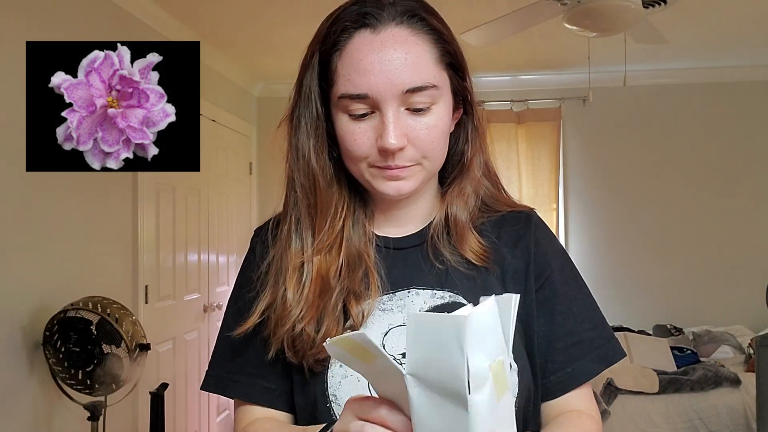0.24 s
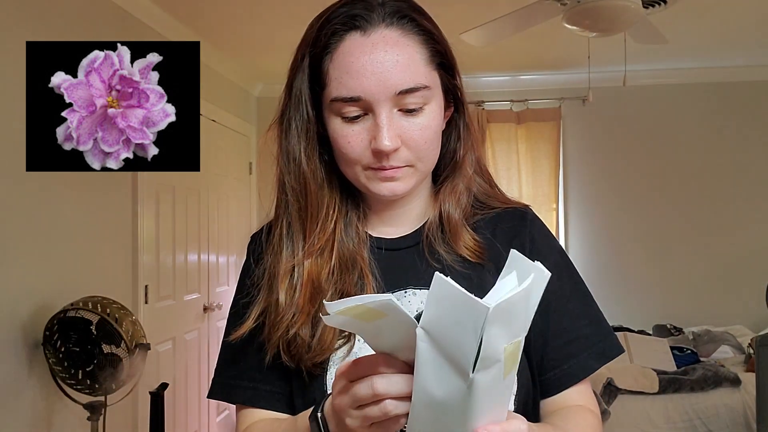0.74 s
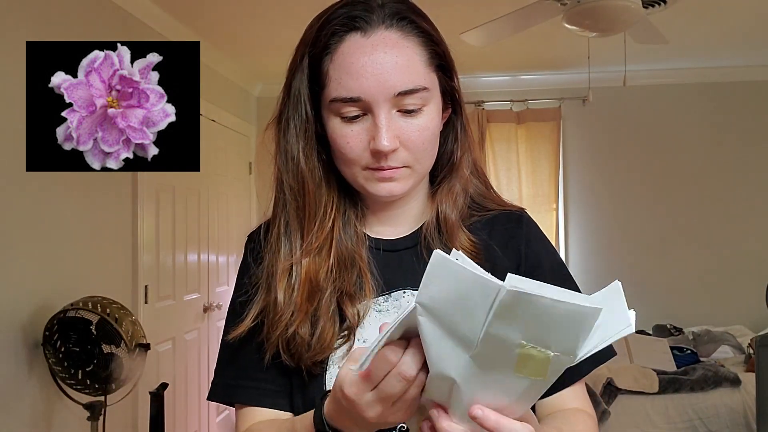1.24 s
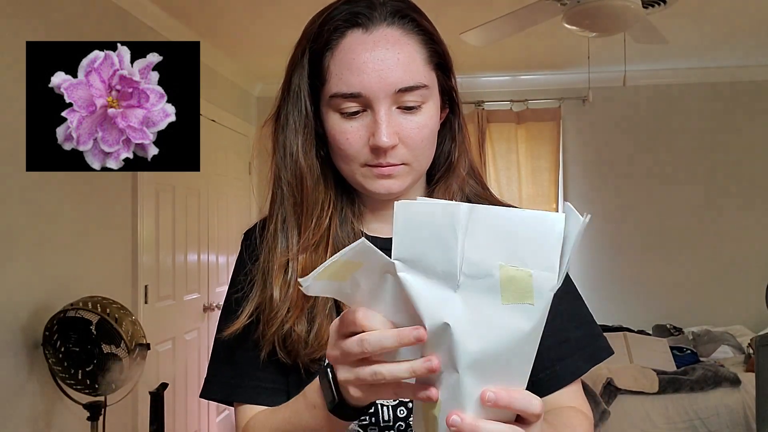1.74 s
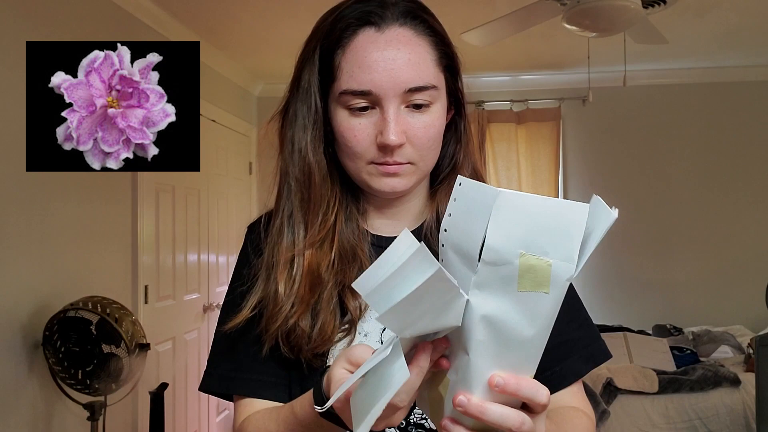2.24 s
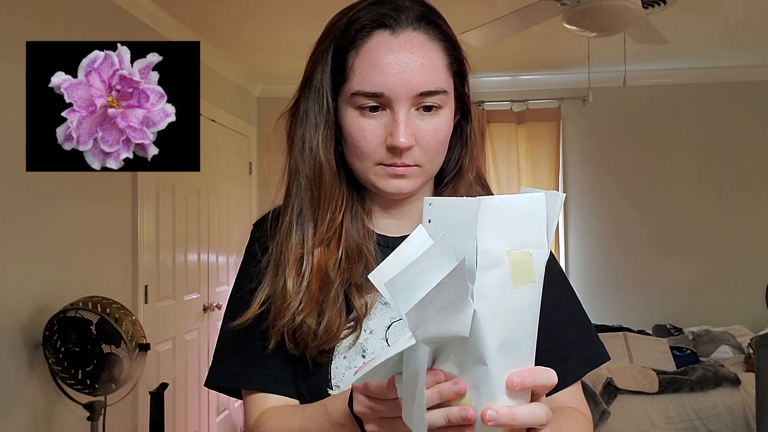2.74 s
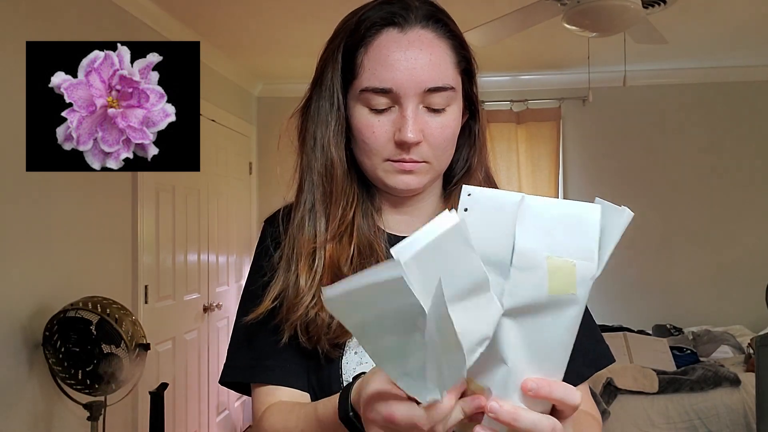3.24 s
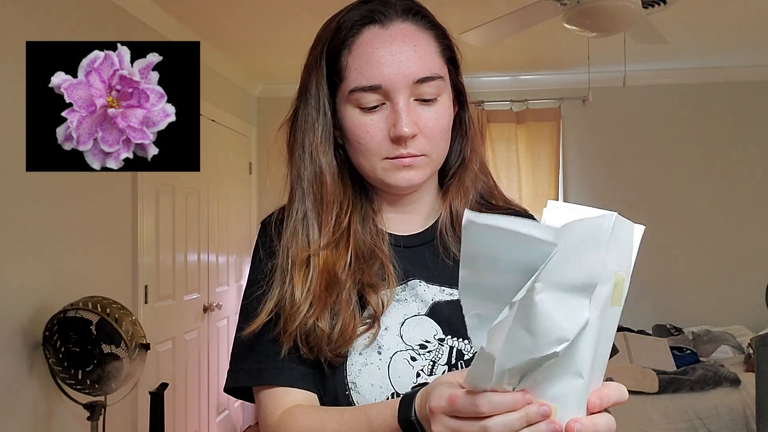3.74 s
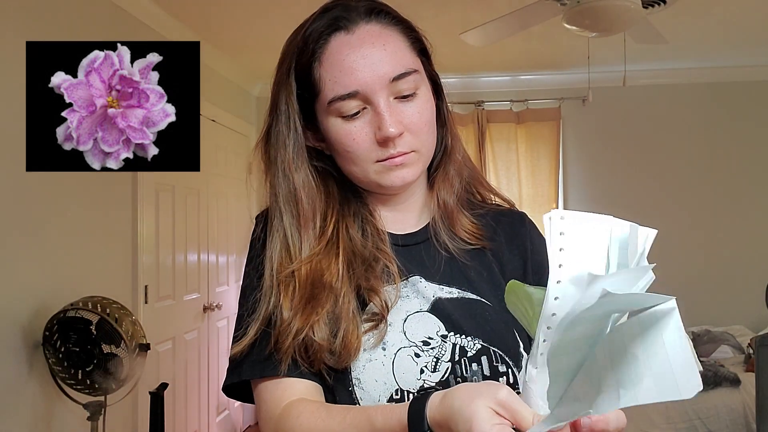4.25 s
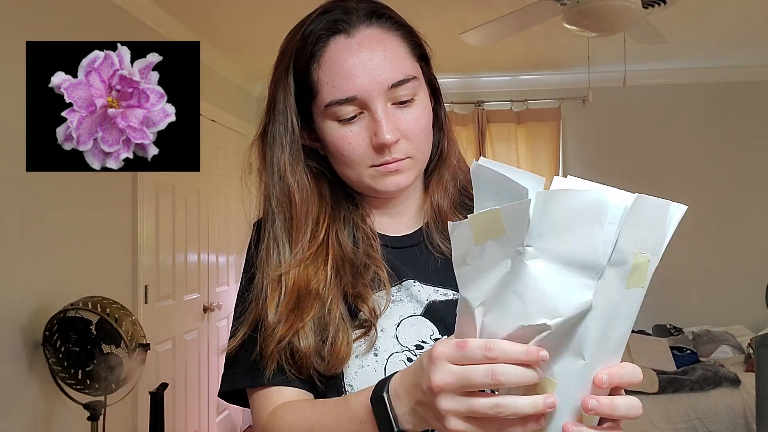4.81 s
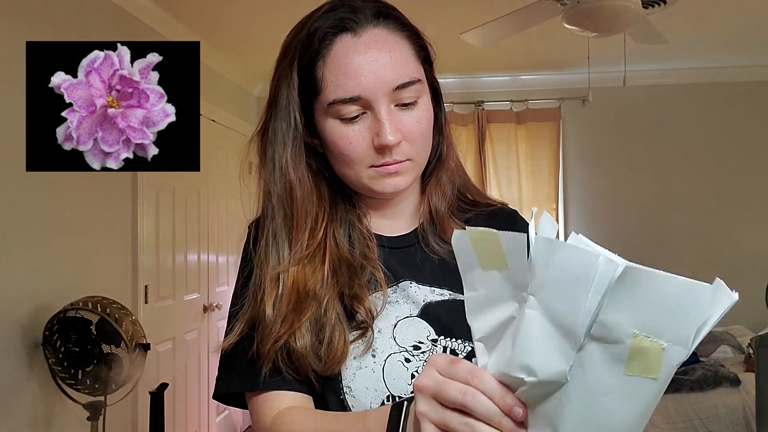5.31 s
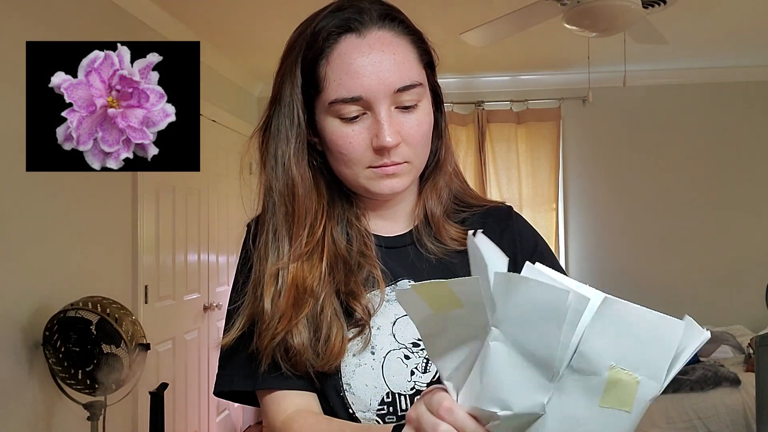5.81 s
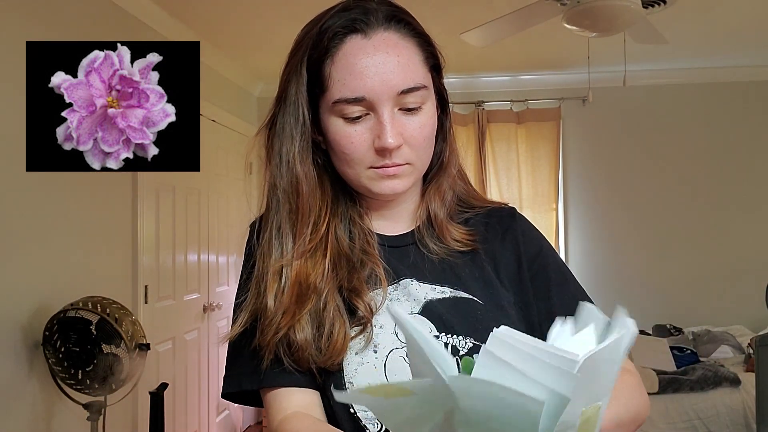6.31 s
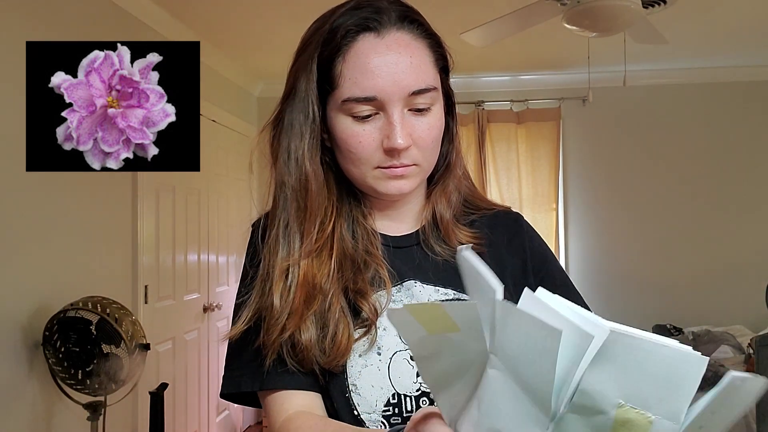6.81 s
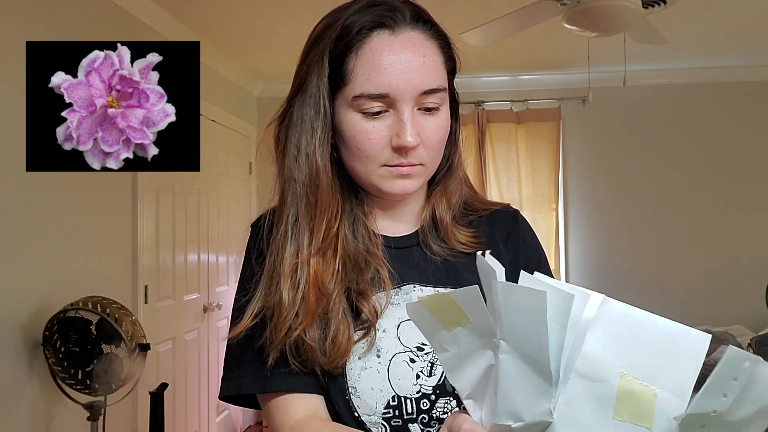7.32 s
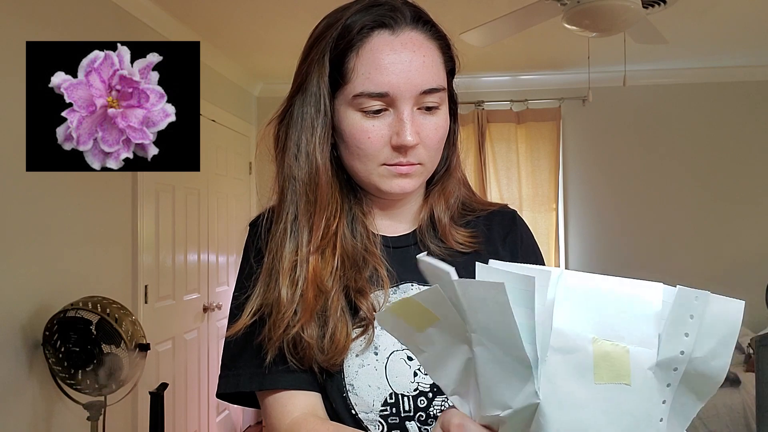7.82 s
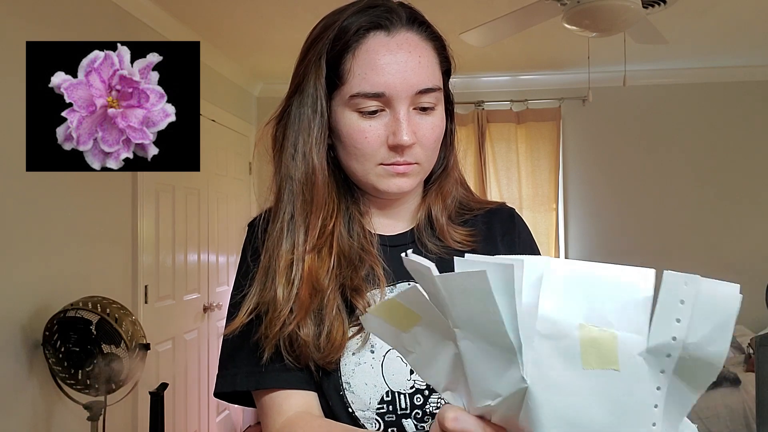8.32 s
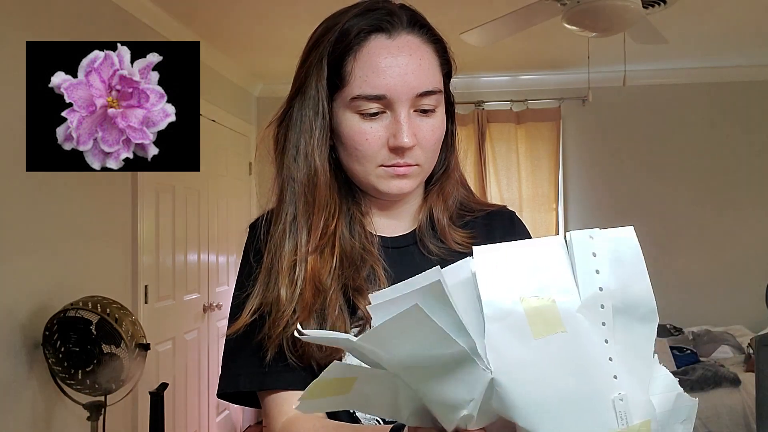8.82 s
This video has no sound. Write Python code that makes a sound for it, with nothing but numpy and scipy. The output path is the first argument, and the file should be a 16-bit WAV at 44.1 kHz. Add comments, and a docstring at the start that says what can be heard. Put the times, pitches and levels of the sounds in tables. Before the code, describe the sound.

A bundle of stiff paper is handled very close to the microphone in a small, quiet, softly furnished room; the left side is much louder and brighter. From 0 to 1 s come small crackles and short rustles. From 1 to 2.8 s the creasing gets busier, with a strong hollow snap near 1.9 s and crisp edge ticks around 2.2 to 2.5 s. At 2.8 to 3.3 s sharp snaps join the fullest rustling, followed by separate cracks until about 4.6 s. It thins to near silence with tiny ticks around 5.2 to 5.8 s. A sudden dense crumple bursts at 5.9 to 6.6 s. Then sparse pops near 7.3 and 7.7 s, light rustling around 8, a soft low bump at 8.3, and stronger snaps at 8.65 and 9 s. Faint low hum and room air stay underneath.

```python
"""Paper cone, peeled and crumpled

A cone of stiff paper sheets is peeled open by hand in a quiet furnished room, close to a pair of
microphone ports; the left port gets it louder and brighter. Clumped puffs of noise make the rustle, struck
resonators the snapping creases and booming panels, short noise bursts the ticks, uneven slips the rasps.
A hand bumps the cone once. Behind lie a diffuse room tail, air noise, mains hum and a wandering low tone."""
import sys
import numpy as np
from scipy import signal
from scipy.fft import rfft, irfft
from scipy.io import wavfile
from scipy.ndimage import map_coordinates

SR = 44100
rng = np.random.default_rng(int(sys.argv[2]) if len(sys.argv) > 2 else 0)


def generate_wav(sig):
    """Save sig (samples, or channels by samples) to the path in sys.argv[1] as 16-bit PCM at SR."""
    pcm = np.round(np.clip(np.atleast_2d(sig).T, -1, 1) * 32767).astype(np.int16)
    wavfile.write(sys.argv[1], SR, pcm)


N = 399546  # length in samples

# Levels in the tables are drives ahead of the room and microphone; some sources add a fixed trim. Bursts of
# crumpling: [full strength at t/s, time to swell by 20 dB/s (at least .01), held/s (at least 0), rustle
# level/dB, treble level/dB re rustle: high when sheets slide]
CRUMPLE_BURSTS = [(0.31, 0.04, 0.024, -42.5, -2.5), (0.449, 0.43, 0.068, -55.5, 5.5),
                  (0.544, 0.12, 0.019, -49, -7), (0.888, 0.05, 0.029, -50, -11), (1.06, 0.11, 0.14, -41, 0),
                  (1.572, 0.27, 0.14, -50.5, -4.5), (1.741, 0.3, .001, -49.5, -7),
                  (1.894, -0.09, 0.07, -43.5, -7), (2.007, 0.14, 0.13, -43.5, -1.5),
                  (2.492, 0.74, .001, -47.5, -9), (2.696, 0.13, 0.0023, -44.5, -7),
                  (2.8, -1, 0.061, -50, -8), (2.895, -0.1, 0.19, -39, -5),
                  (3.065, -0.1147, 0.00086, -32, -5), (3.305, 0.06, 0.0011, -32.5, -7.5),
                  (3.536, 0.07, .001, -37, -6), (3.715, -0.43, .001, -44.5, -14),
                  (3.82, -0.1, 0.039, -52, -7), (3.9, 0.18, 0.24, -47, -4), (4.319, 0.35, .001, -45, 0.5),
                  (4.646, 0.13, .001, -40, -11), (4.808, 0.3, 0.0011, -46.5, -9),
                  (5.074, 0.12, 0.0011, -51, 1.5), (5.272, 0.76, 0.0011, -51, -7),
                  (5.974, 0, 0.052, -39, -2), (6.124, -0.0067, 0.032, -38, -1.5),
                  (6.174, 0.0465, 0.0056, -31.5, -3), (6.356, 0.03, 0.15, -39, -1.5),
                  (6.544, 0.2, 0.0012, -34, -6), (7.304, 0.2, 0.001, -48, -11),
                  (7.89, 0.1, 0.0047, -55.5, 5), (8.05, 0.68, 0.036, -51.5, -9),
                  (8.292, 0.08, 0.0011, -49.5, -4), (8.433, -0.43, 0.16, -52, -6),
                  (8.577, -0.05, 0.14, -48, -3), (9.03, 0.04, .04, -39, -13)]
FADE_DB_PER_S = 181  # how fast a burst dies when the hands let go
# The cone held between bursts: [t/s, faint rustle level/dB, lows level/dB re rustle]
HOLDING_GRIP = [(0.0, -63.5, 5.5), (0.67, -59, -6.5), (0.83, -63, -14), (1.46, -57, -5.5), (1.9, -58, -1.5),
                (3.0, -46.5, -6), (4.3, -71.5, -10), (5.15, -79, -9), (5.44, -74.5, -11),
                (5.74, -60.5, -4.5), (5.9, -52.5, -5), (6.1, -80, -3), (6.24, -60, 7.5), (6.31, -52, -5),
                (6.73, -63.5, -9.5), (7.0, -56.5, -10.5), (7.25, -62, -11), (7.8, -61, -12),
                (8.2, -63.5, -7.5), (8.88, -48, -8.5), (8.97, -56.5, -13)]
FAINT_TREBLE_DB = -5  # re the faint rustle
# A grip firmer than this stiffens the panels: the lows grow less than the rustle
FIRM_DB, LOWS_PER_DB = -48, -0.2743
# Colour of the rustle: [f/Hz, relative level/dB]
PAPER_COLOUR = [(110, -14.5), (200, -8), (460, -5.5), (1000, -5.5), (2000, -8), (4500, -9), (6800, -12.5),
                (9500, -7.5), (14800, -7), (16500, -5)]
# Centres of the panel, crease and edge regions: [f/Hz]
REGION_HZ = [466, 2030, 9900]
# Resonance of the hollow of the cone: [t/s, f/Hz]
HOLLOW_PITCH = [(.2, 342), (.25, 773), (.7, 680), (1.1, 484), (2.3, 488), (2.5, 413), (2.9, 585),
                (3.1, 436), (5.85, 460), (5.96, 820), (6.12, 560), (6.2, 875), (6.33, 750), (6.38, 436),
                (8.65, 640), (8.8, 462)]
# Creases snapping: [t/s, 1.3 ms before the crack, level/dB, crease f/Hz,
# panel level/dB and treble level/dB re the crease, both before a trim]
CREASE_SNAPS = [(0.148, -37.5, 1180, 8, -26), (0.257, -29, 1170, -11, -30), (0.309, -30, 4160, 3, -17),
                (0.434, -21.5, 3500, -10, 1), (0.526, -26, 1250, -4, -14), (0.568, -39.5, 1300, 5, -25),
                (0.604, -37, 2450, 1.5, -30.5), (0.878, -25, 2730, -38, -43.5),
                (1.158, -22.5, 2300, -10.5, -25), (1.222, -27, 2100, -3, -13.5),
                (1.302, -27.5, 2290, -12, -16.5), (1.384, -53, 2040, 20, -1), (1.568, -26.5, 2340, -40, -5),
                (1.666, -25, 3730, -13, -11), (1.725, -25, 1500, -1.5, -22.5), (1.73, -23, 1940, 0, -15.5),
                (1.758, -30, 2220, 2.5, -7.5), (1.831, -28, 2050, -7.5, -31), (1.878, -12, 1470, -6, -15.5),
                (1.949, -32, 2030, 9, -21), (2.118, -22.5, 2130, -10, -8), (2.222, -32, 2960, 6, -3),
                (2.489, -21.5, 3870, -2.5, -4), (2.551, -27, 2060, -12.5, -17.5),
                (2.664, -22.5, 3670, -22, -9.5), (2.788, -14, 2330, -22, -14.5),
                (2.891, -25.5, 2100, -5, -29), (2.965, -24, 2050, -11, -22), (3.057, -18, 2370, -39, -52),
                (3.092, -24, 2070, -31, -25.5), (3.295, -16, 3840, -21, -19),
                (3.348, -22.5, 2260, -29, -14), (3.709, -29, 2180, -10.5, -19),
                (3.81, -22, 2820, -23, -10.5), (3.892, -18.5, 4000, -18.5, -9.5),
                (3.978, -24.5, 1390, -11, -24.5), (3.999, -21, 3400, -27, -8),
                (4.107, -24, 3460, -44.5, -13), (4.303, -20.5, 1470, -18, -27),
                (4.456, -34, 1340, -6.5, -9.5), (4.589, -17.5, 2400, -61.5, -64),
                (4.797, -38.5, 2000, 3, -18), (4.961, -32.5, 1350, -1, -33),
                (5.163, -24.5, 1380, -21.5, -37), (5.942, -26, 1710, -37, -32),
                (5.966, -19.5, 2670, -8.5, -8), (6.013, -22.5, 2170, -14, -4),
                (6.122, -28, 1900, -1.5, -10), (6.172, -14.5, 1680, -47, -9), (6.178, -31, 1310, -4, -13),
                (6.212, -21, 1250, -46, -8), (6.217, -22.5, 1030, -0.5, -15), (6.476, -20.5, 1280, -17, -9),
                (6.506, -17, 2100, -30, -19), (6.545, -30, 2000, 0.5, -6), (7.287, -22, 1610, -12.5, -10),
                (7.671, -35.5, 1620, -31, -54), (8.421, -32.5, 3620, -33, -5),
                (8.648, -15.5, 1390, -44, -16), (8.75, -22.5, 1360, -12.5, -27), (8.9, -30, 1650, -35, -6),
                (9.003, -15, 1450, -19.5, -12.5)]
# Modes of a panel: [f as a multiple of the hollow's pitch, level/dB]
PANEL_MODES = [(1.001, 3.5), (1.9, -4)]
# Sheet edges flicking past each other, dry and short: [t/s, peak level/dB, f/Hz]
EDGE_TICKS = [(1.038, -34, 3000), (1.231, -14, 2250), (1.702, -31, 5000), (2.156, -28, 5210),
              (2.181, -15.5, 2780), (2.208, -17.5, 4500), (2.384, -24, 3500), (2.451, -19, 4300),
              (4.78, -30, 3300), (5.492, -44, 6000), (5.549, -41, 4500), (5.571, -42, 5000),
              (5.597, -39, 6000), (5.751, -45, 5000), (5.808, -29, 4000), (6.869, -23.5, 1500),
              (7.883, -21, 10000), (7.964, -35, 1100), (8.254, -38, 3500), (8.794, -30, 1000)]
TICK_DECAY_S, TICK_OCTAVES = .0015, 0.98  # octaves to either side of the pitch
# A fold dragged over another sheet: [t/s, length/s, rms level/dB before the swell, f/Hz]
FOLD_SCRAPES = [(0.313, 0.033, -33, 4100), (1.09, 0.024, -33, 4100), (1.166, 0.026, -31, 2190),
                (2.891, 0.036, -30, 950), (8.044, 0.017, -43, 2100), (8.558, 0.056, -42, 2100)]
# A hand bumps the cone
THUD_S, THUD_DB, THUD_HZ, THUD_T60_S = 8.285, -38, 134, 0.063
# The cone moves across the ports: [t/s, delay of the right port/s]
RIGHT_PORT_LAG = [(2.2, .00008), (3.6, -.00002)]
ROOM_T60_S, ROOM_DB = 0.2, -10.5
# Likeness of left and right noise: [f/Hz, likeness 0 to 1]
PORT_LIKENESS = [(60, .95), (700, .6), (3000, .4), (7000, .1), (15000, 0)]
# Colour of the room air: [f/Hz, relative level/dB]
AIR_COLOUR = [(18, -31), (30, -12), (81, -1), (124, -14), (402, -22), (981, -58), (15800, -61)]
AIR_DB = -54.5  # rms
# Mains hum: [f/Hz, rms level/dB]
MAINS_HUM = [(60.5, -50)]
# A low tone that comes and goes: [t/s, f/Hz, rms level/dB]
LOW_DRONE = [(0, 85, -83), (1.2, 85.9, -57), (2.9, 82.7, -50), (4.3, 86, -64)]
# Resonances and a dip of the microphone housing: [f/Hz, width/Hz, level/dB]
MIC_HOUSING = [(1020, 68, -7), (2082, 260, 5), (3850, 890, 3)]
# Difference between the ports: [f/Hz, left minus right level/dB]
PORT_DIFFERENCE = [(60, 6), (300, 8), (2400, 10.5), (4400, 14.5), (8500, 13), (14000, 9)]
CUTOFF_HZ = 15760


def handling():
    """Bursts swell, hold and fade; their powers add to the faint rustle of holding, also in the treble."""
    faint_db, lows_db = in_time(HOLDING_GRIP)
    t = np.arange(0, N, 64) / SR
    power = 0
    for full_s, swell_s, held_s, db, treble_db in CRUMPLE_BURSTS:
        rise_db = 20 * np.maximum(full_s - t, 0) / max(swell_s, .01)
        fade_db = FADE_DB_PER_S * np.maximum(t - full_s - max(held_s, 0), 0)
        shape_db = db - rise_db - fade_db
        power = power + from_db([shape_db, shape_db + treble_db]) ** 2
    bursts = np.array([np.interp(np.arange(N) / SR, t, p) for p in power])
    faint = from_db([faint_db, faint_db + FAINT_TREBLE_DB]) ** 2
    level_db, treble_db = 10 * np.log10(bursts + faint)
    panel_db = lows_db + LOWS_PER_DB * (level_db - FIRM_DB)
    return level_db, panel_db, treble_db - level_db


def rustle(per_s, size_db, spread_oct, grain_s, slide_db, patchy_db):
    """Clumped tiny buckles each puff noise around a pitch of their own, over the hiss of sliding sheets."""
    level_db, panel_db, edge_db = handling()
    hollow_hz, = in_time(HOLLOW_PITCH)
    born = rng.random(N) < per_s * from_db(2.5 * drift(20)) / SR
    sizes = from_db(size_db * np.minimum(rng.exponential(1, N), 2.2))[born]
    pitches_hz = (200 * 80 ** rng.random(N))[born]
    slide = from_db(slide_db + drift(8))

    def envelope(hz):
        """A band hears the buckles pitched near it; low ones last longer."""
        near = np.zeros(N)
        near[born] = sizes * np.exp(-(np.log2(pitches_hz / hz) / spread_oct) ** 2)
        decay = np.exp(-1 / ((grain_s + 2 / hz) * SR))
        grains = signal.lfilter([1], [1, -decay], near + 1e-18)
        return rms_one(rms_one(grains) + slide)

    def shares(hz):
        """How much a band belongs to the panel, crease and edge regions."""
        return np.array([np.interp(np.log(hz), np.log(REGION_HZ), row) for row in np.eye(3)])

    def band_db(hz):
        """The handling colour blends between the regions; every band also flickers by itself."""
        panel, _, edge = shares(hz)
        lows_db = panel * min(hz / 300, 1) ** 2 * panel_db / 2
        # the hollow sings more as the lows grow
        hollow_db = np.maximum(11 + panel_db / 2, 0) / (1 + (np.log2(hz / hollow_hz) / .35) ** 2)
        return level_db + lows_db + hollow_db + edge * edge_db + patchy_db * drift(33.0)

    return from_db(17) * banded(PAPER_COLOUR, envelope, band_db, 1 / 3)


def snaps(crack_s, crease_cycles, panel_cycles):
    """A crack of a few ms rings the crease; the panel behind swells and booms at the hollow's pitch."""
    length = 4096
    out = np.zeros((2, N + length))
    t = np.arange(length) / SR
    bright = signal.butter(2, 5500, "high", fs=SR, output="sos")
    small = signal.butter(3, 230, "high", fs=SR, output="sos")  # a small panel radiates no bass
    crack = np.minimum(t / 0.0005, 1) * np.exp(-t / crack_s)
    burst = crack + 0.29 * np.exp(-t / 0.01)  # the fold keeps crackling faintly
    flap = 0.9 * np.exp(-t / 0.0066)  # and shakes the panel unevenly
    noise = rng.standard_normal((len(CREASE_SNAPS), 3, length))
    for (s, snap_db, crease_hz, panel_db, treble_db), (shared, *own) in zip(CREASE_SNAPS, noise):
        own = np.array(own)
        both = shared + own
        body = signal.butter(2, [crease_hz / 2.43, crease_hz * 1.87], "band", fs=SR, output="sos")
        tone = ring(crack * both, crease_hz, crease_cycles / crease_hz)
        crease = 1.1 * tone / np.abs(tone).max() + 1.8 * signal.sosfilt(body, burst * both)
        treble = signal.sosfilt(bright, burst * own)

        panel_hz = np.interp(s, *np.transpose(HOLLOW_PITCH))
        shake = ring(crack * np.abs(shared) + flap * shared, 1.4 * panel_hz, 1.5 / panel_hz)
        panel = sum(from_db(db) * ring(shake, k * panel_hz, panel_cycles / k / panel_hz)
                    for k, db in PANEL_MODES)
        panel = signal.sosfilt(small, panel)
        panel = panel / np.abs(panel).max()

        sound = crease + from_db(treble_db + 13.5) * treble + from_db(panel_db + 6.0) * panel
        at = round((s + 0.0013) * SR)  # the crack begins 1.3 ms after the table's time
        out[:, at:at + length] += from_db(snap_db) * sound
    return out[:, :N]


def ticks():
    """A flicked sheet edge gives a puff of noise of a millisecond or so around its pitch."""
    length = 1024
    out = np.zeros((2, N + length))
    decay = np.exp(-np.arange(length) / SR / TICK_DECAY_S)
    noise = rng.standard_normal((len(EDGE_TICKS), 3, length))
    for (s, peak_db, hz), (shared, *own) in zip(EDGE_TICKS, noise):
        edges_hz = [hz / 2 ** TICK_OCTAVES, min(hz * 2 ** TICK_OCTAVES, SR / 2.2)]
        band = signal.butter(1, edges_hz, "band", fs=SR, output="sos")
        puff = signal.sosfilt(band, decay * (shared + np.array(own)))
        at = round(s * SR)
        out[:, at:at + length] += from_db(peak_db) * puff / np.abs(puff).max()
    return out[:, :N]


def scrapes(slips_per_s, cycles):
    """Uneven slips of a dragged fold ring it for a few cycles under a swell."""
    length = 4096
    out = np.zeros((2, N))
    chances = rng.random((len(FOLD_SCRAPES), 3, length))
    for (s, long_s, db, hz), (when, *push) in zip(FOLD_SCRAPES, chances):
        swell = np.sin(np.pi * np.clip(np.arange(length) / SR / long_s, 0, 1))
        slips = (when < slips_per_s / SR) * (np.array(push) - .5) + 1e-18
        rasp = rms_one(ring(slips, hz, cycles / hz))
        at = round(s * SR)
        out[:, at:at + length] += from_db(db) * swell * rasp
    return out


def thud():
    """A soft push rings the whole cone low and briefly."""
    push = np.zeros(N)
    soft = np.hanning(round(SR / THUD_HZ / 2))
    push[round(THUD_S * SR):][:len(soft)] = from_db(THUD_DB) * 2 * soft / soft.sum()
    return ring(push + 1e-18, THUD_HZ, THUD_T60_S)


def room(x):
    """A diffuse tail, different at each port, sets in after the first walls answer."""
    t = np.arange(SR // 2) / SR
    tail = rng.standard_normal((2, len(t))) * from_db(-60 * t / ROOM_T60_S) * (t > .005)
    tail = rms_one(tail) / np.sqrt(len(t))
    return from_db(ROOM_DB) * signal.fftconvolve(x, tail, axes=1)[:, :N]


def background():
    """Room air is shaped noise; mains hum and a wandering low tone are sines."""
    air = rms_one(banded(AIR_COLOUR, lambda hz: 1, lambda hz: 1.5 * drift(1.5), 1 / 2))
    t = np.arange(N) / SR
    hum = sum(from_db(db + 0.43 * drift(6.3)) * np.sqrt(2) * np.sin(2 * np.pi * hz * t)
              for hz, db in MAINS_HUM)
    drone_hz, drone_db = in_time(LOW_DRONE)
    drone = from_db(drone_db) * np.sqrt(2) * np.sin(2 * np.pi * np.cumsum(drone_hz) / SR)
    return from_db(AIR_DB) * air + hum + drone


def banded(spectrum, envelope, band_db, octaves):
    """Stereo noise is split in bands, each with its envelope, level, extra gain and likeness."""
    out = 0
    edges_hz = 30 * 2 ** np.arange(0, 9.4, octaves)
    white = rng.standard_normal((2, 2, N))  # neighbouring bands take turns
    for k, (low, high) in enumerate(zip(edges_hz, edges_hz[1:])):
        hz = np.sqrt(low * high)
        band = signal.butter(2, [low, high], "band", fs=SR, output="sos")
        mid, side = signal.sosfilt(band, white[k % 2] * envelope(hz))
        alike = np.clip(at_hz(PORT_LIKENESS, hz), -1, 1)
        gain = from_db(at_hz(spectrum, hz) + band_db(hz))
        stereo = np.sqrt(1 + alike) * mid + np.sqrt(1 - alike) * side * [[1], [-1]]
        out = out + gain * stereo
    return out


def ring(push, hz, t60):
    """A two-pole resonator: a unit click sets a sine ringing from height 1, down 60 dB after t60."""
    r, w = from_db(-60 / (t60 * SR)), 2 * np.pi * hz / SR
    return signal.lfilter([0, np.sin(w)], [1, -2 * r * np.cos(w), r * r], push)


def drift(rate_hz):
    """Slow chance of spread 1: noise low-passed around rate_hz, computed every 40 samples."""
    r = np.exp(-80 * np.pi * rate_hz / SR)
    noise = rng.standard_normal(N // 40 + 1002)
    slow = signal.lfilter([1], [1, -2 * r, r * r], noise)[1000:]  # skip the settling
    return np.interp(np.arange(N) / 40, np.arange(len(slow)), rms_one(slow))


def from_db(db):
    """Amplitude of a level in dB."""
    return 10 ** (np.asarray(db) / 20)


def rms_one(x):
    """Scale to an rms of 1 over all channels."""
    return x / np.sqrt(np.mean(x ** 2) + 1e-20)


def in_time(rows):
    """Spread the columns of a table over all samples."""
    s, *columns = np.transpose(rows)
    return [np.interp(np.arange(N) / SR, s, c) for c in columns]


def at_hz(points, hz):
    """Read a curve along log frequency."""
    curve_hz, values = np.array(points).T
    return np.interp(np.log(hz), np.log(curve_hz), values)


def scene():
    """Paper moves across the ports in the room, over the background."""
    paper = rustle(per_s=500, size_db=6.0, spread_oct=0.71, grain_s=.0007, slide_db=4.5, patchy_db=2.0)
    paper = paper + snaps(crack_s=.001, crease_cycles=12.0, panel_cycles=11.0)
    paper = paper + ticks() + thud() + scrapes(slips_per_s=2700, cycles=11.0)
    lag_s, = in_time(RIGHT_PORT_LAG)
    right = map_coordinates(paper[1], [np.arange(N) - lag_s * SR], order=5)
    paper = np.array([paper[0], right])
    return paper + room(paper) + background()


def record(dry):
    """The housing colours both ports; the right one is shadowed; the top is cut."""
    hz = np.maximum(np.arange(N // 2 + 1) * SR / N, 1)
    housing = from_db(sum(db / (1 + (2 * (hz - mid_hz) / width) ** 2)
                          for mid_hz, width, db in MIC_HOUSING))
    housing = housing / np.sqrt(1 + (40 / hz) ** 6)  # the deepest bass is lost
    shadow = from_db(-at_hz(PORT_DIFFERENCE, hz))
    ports = irfft(rfft(dry) * [housing, housing * shadow], N)
    top_cut = signal.ellip(12, .5, 62, CUTOFF_HZ, fs=SR, output="sos")
    return signal.sosfilt(top_cut, ports)


dry = scene()
out = record(dry)
generate_wav(out)
```